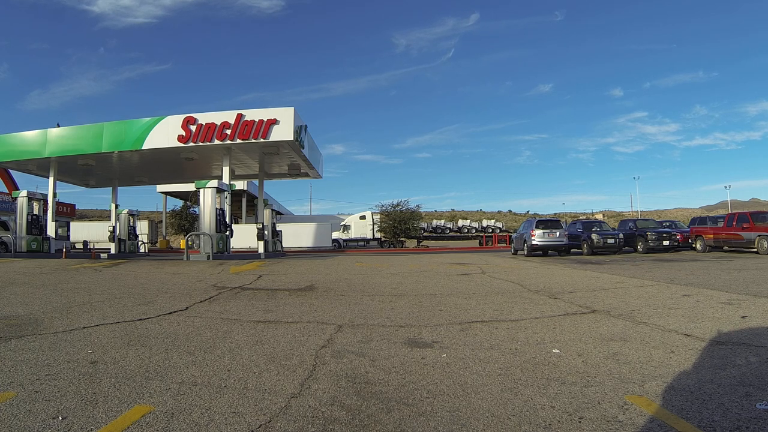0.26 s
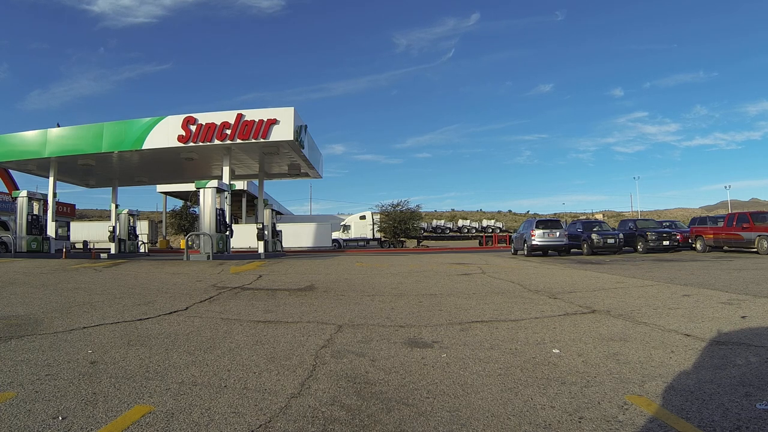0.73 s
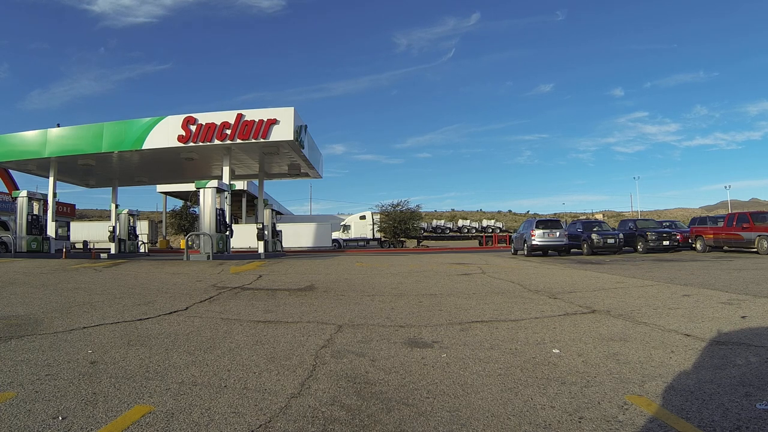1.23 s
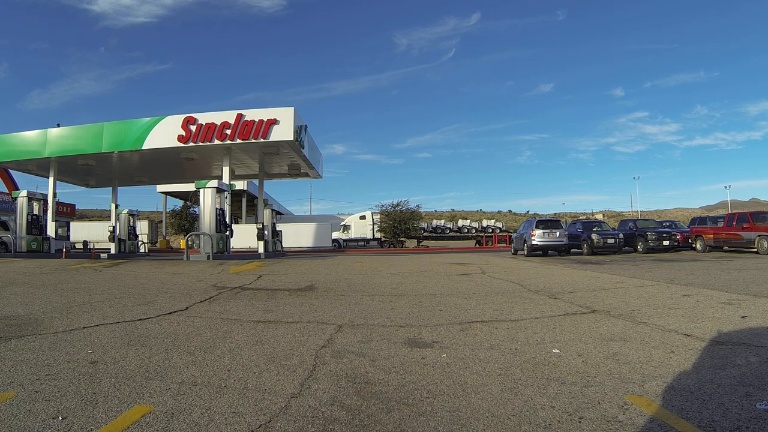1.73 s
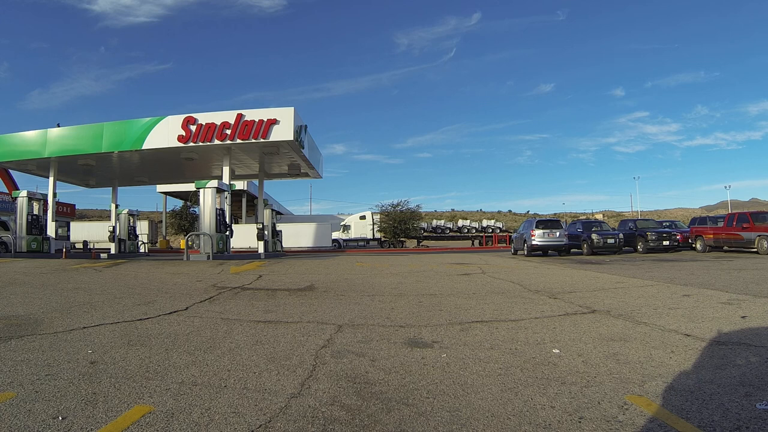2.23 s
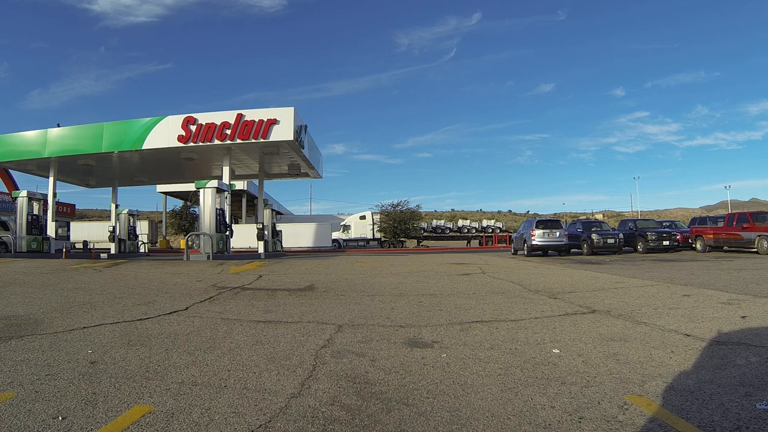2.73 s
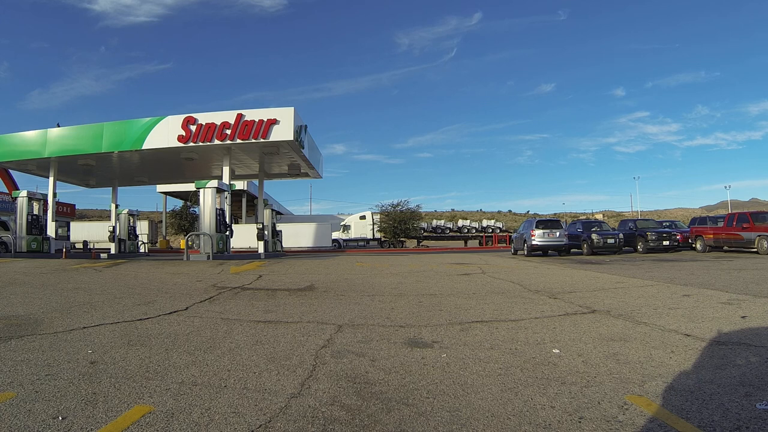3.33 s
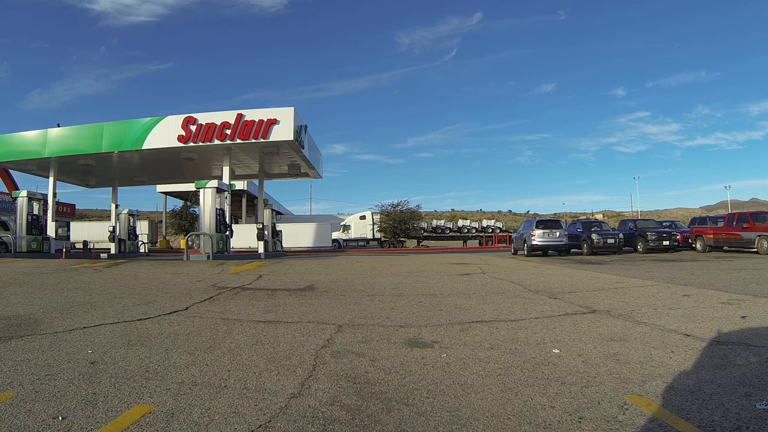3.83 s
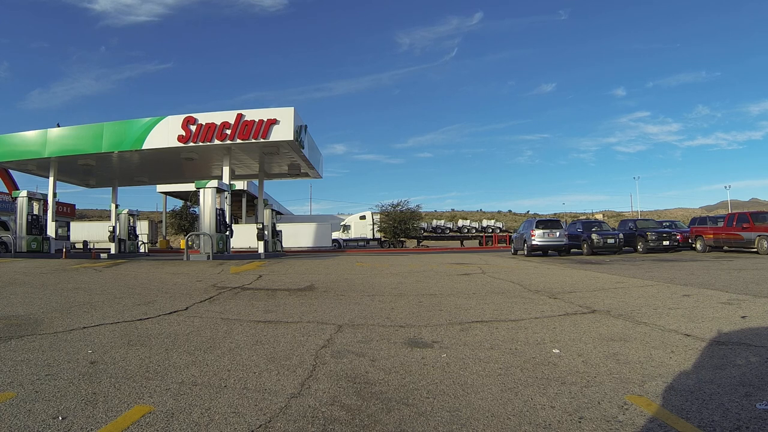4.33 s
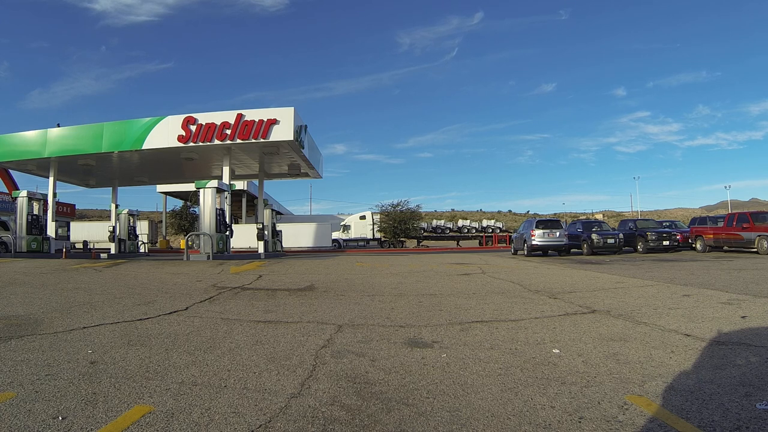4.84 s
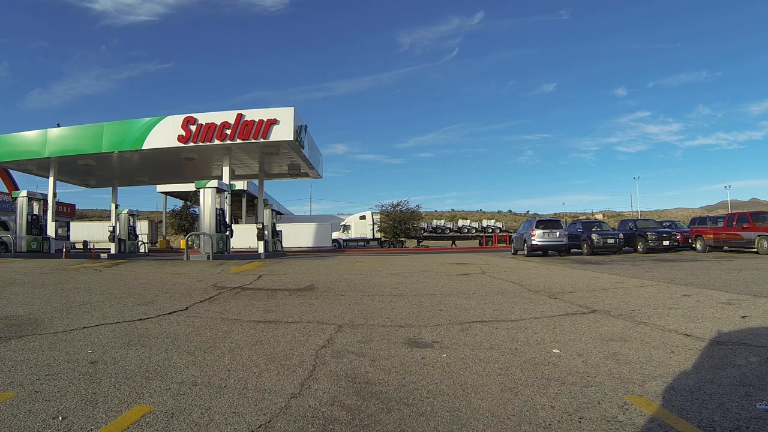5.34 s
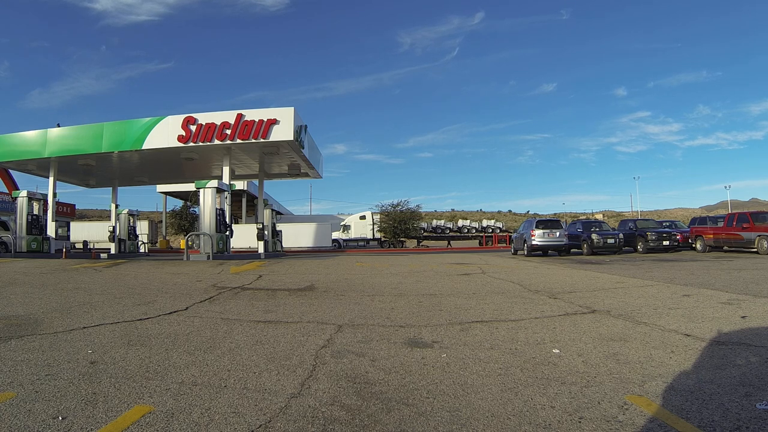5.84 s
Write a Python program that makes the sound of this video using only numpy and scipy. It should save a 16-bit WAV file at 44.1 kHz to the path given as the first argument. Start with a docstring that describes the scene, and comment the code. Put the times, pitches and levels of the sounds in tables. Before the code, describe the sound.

Low throbbing truck idle outdoors, a clattering diesel swelling closer, a quick squeaky air-valve spurt, and later a thump with long fading hiss.

```python
"""Parked diesels idle across a truck stop, short harmonic series beating together, as a nearer semi creeps by.
The semi knocks (noise bursts through its block), whines and drones (multiples of its crank rate), and hisses.
After one second its brake valves clack, squeak and spurt shaped noise; later a brake dumps its air
with a thump and a long fading hiss under the canopy.
Behind lies the yard's rumble; a faint electronic whine pulses on top."""
import sys
import numpy as np
from scipy import signal
from scipy.fft import rfft, irfft, next_fast_len
from scipy.io import wavfile
from scipy.ndimage import uniform_filter1d

SR = 44100
rng = np.random.default_rng(int(sys.argv[2]) if len(sys.argv) > 2 else 0)


def to_wav(sig):
    """Store sig (one row per channel, or 1-D mono) as 16-bit WAV at the path in sys.argv[1].

    Samples outside -1..1 are clipped; the rate is SR.
    """
    pcm = np.clip(np.atleast_2d(sig), -1, 1) * 32767
    pcm = np.round(pcm).astype(np.int16)
    wavfile.write(sys.argv[1], SR, pcm.T)  # frames by channels


N = 267880
TIME = np.arange(N) / SR


def gain_of(db):
    """Decibels to an amplitude factor."""
    return 10 ** (np.asarray(db) / 20)


def evened(x):
    """Scales to rms 1."""
    return x / np.sqrt(np.mean(x ** 2) + 1e-20)


def curve(rows, t=TIME):
    """Points joined by straight lines in time."""
    return np.interp(t, *np.transpose(rows))


def read(points, hz):
    """A spectrum in dB, joined by straight lines over log frequency."""
    f, db = np.transpose(points)
    return np.interp(np.log(hz + 1), np.log(f + 1), db)


def coloured(x, points, bumps=()):
    """Gives x a broad spectrum with peaks (or dips, where the lift is negative) on top, at rms 1."""
    size = next_fast_len(N)
    hz = np.fft.rfftfreq(size, 1 / SR)
    db = read(points, hz)
    for f, width, lift in bumps:
        db = db + lift / (1 + (2 * (hz - f) / width) ** 2)
    return evened(irfft(rfft(x, size) * gain_of(db), size)[:N])


def air(points, bumps=()):
    """Noise of a given colour, as of turbulent air, rms 1."""
    return coloured(rng.standard_normal(N), points, bumps)


def swept(x, field):
    """A moving filter: field(Hz, s) gives its gain in dB."""
    hz, t, z = signal.stft(x, SR, nperseg=512, noverlap=384)
    return signal.istft(z * gain_of(field(hz[:, None], t)), SR, nperseg=512, noverlap=384)[1][:N]


def drift(rate):
    """Random wander of rms 1: twelve sine waves, the fastest at rate Hz."""
    t = np.linspace(0, TIME[-1], num=2000)
    waves = sum(np.sin(2 * np.pi * (f * t + rng.random())) for f in rate * np.geomspace(.1, 1, num=12))
    return np.interp(TIME, t, evened(waves))


def burst(s, hold, t60, rise=0.0038):
    """A gain that opens at s, holds (timed from s), and dies away by 60 dB in t60 seconds."""
    t = TIME - s
    return np.clip(t / rise, 0, 1) * 1e-3 ** (np.maximum(t - hold, 0) / t60)


def arch(centre, width, t=TIME):
    """A smooth rise to 1 and back."""
    return np.exp(-((t - centre) / width) ** 2)


def cycle_db(crest, period, depth_db):
    """A slow, regular swell in dB."""
    return depth_db * np.cos(2 * np.pi * (TIME - crest) / period)


def swells(rows):
    """A gain that rises, holds and falls once for each row; rows add in power."""
    power = 0
    for start, end, db, rise, fall in rows:
        level_db = db - rise * np.maximum(start - TIME, 0) - fall * np.maximum(TIME - end, 0)
        power = power + gain_of(level_db) ** 2
    return np.sqrt(power)


def squeal(hz, width_hz):
    """Noise in a narrow band that follows a pitch curve; rms 1."""
    noise = rng.standard_normal(N) + 1j * rng.standard_normal(N)
    narrow = signal.lfilter(*signal.butter(2, width_hz, fs=SR), noise)
    return evened((narrow * np.exp(2j * np.pi * np.cumsum(hz) / SR)).real)


# Far traffic and machinery across the yard. Each row: frequency in Hz, relative density in dB per Hz.
YARD = [(10, -22), (18, -4.5), (35, -1.5), (65, 1), (105, -3), (160, -5.5), (215, -9.5), (285, -9.5),
        (400, -16.5), (700, -17.5), (1400, -22.5), (2500, -34.5), (4200, -41), (11000, -58.5), (15000, -62)]
# Gentle rises and dips in the yard's noise. Each row: centre in Hz, width in Hz, lift in dB (negative cuts).
YARD_BUMPS = [(590, 50, 3), (1664, 110, 3), (2880, 800, 0), (3440, 200, 1.5), (10700, 700, -8)]


def yard_rumble():
    """Far traffic and machinery: noise weighted to the bass, wavering gently."""
    return gain_of(-37.5 + .5 * drift(1.99)) * air(YARD, YARD_BUMPS)


# Engines parked across the lot. Each row: firing rate in Hz, then levels of harmonics 1 to 4 in dB
# before the throb and the overtones' slow changes.
IDLERS = [(26.6, -37, -44, -62, -58), (45.0, -34, -43, -52, -57), (44.44, -58, -44, -52, -60),
          (54.95, -47, -44, -60, -62)]
# Swells of all harmonics, then of the overtones alone: time of a crest in seconds, period in seconds,
# depth in dB.
THROB = (1.6, 1.76, 0.9)
OVERTONE_THROB = (1.84, 1.017, 2.8)


def parked_engines(wander_turns=0.014, waver_db=0.45):
    """Each exhaust is a short harmonic series; near rates beat, and overtones ease off over time."""
    out = np.zeros(N)
    overtones_db = 1.5 - 0.54 * TIME + cycle_db(*OVERTONE_THROB)
    for hz, *levels in IDLERS:
        turns = hz * TIME + rng.random() + wander_turns * drift(1.207)
        for k, db in enumerate(levels, 1):
            level_db = db + waver_db * k * drift(2.7) + overtones_db * (k > 1)
            out += gain_of(level_db) * np.sin(2 * np.pi * (k * turns + rng.random()))
    throb_db = -1.44 + 0.37 * TIME + cycle_db(*THROB)  # the whole level grows slowly
    return np.sqrt(2) * out * gain_of(throb_db)


# The semi swings past and away from the microphone.
PASS_S, PASS_WIDTH_S = 3.6, 1  # midpoint and half length in seconds


def moved(t):
    """How far the semi has swung away, 0 to 1."""
    return (1 + np.tanh((t - PASS_S) / PASS_WIDTH_S)) / 2


# Six cylinder knocks in one crank turn: the strength of each in dB.
STROKES_DB = [0.5, -1.3, -1.5, -2, 1.2, -2.5]


def knocks(turns, knock_t60=0.187, ring_t60=0.57, ring_db=-9, loose=0.43, uneven=0.13):
    """Six knocks a crank turn, each repeating its own ring at one of three lags, plus loose rattle."""
    slots = len(STROKES_DB)
    stroke = np.floor(turns * slots).astype(int)
    at = np.flatnonzero(np.diff(stroke)) + 1
    t = np.arange(SR // 4) / SR
    steady, power, blows = np.zeros(N), np.zeros(N), np.zeros(N)
    blows_db = np.take(STROKES_DB, stroke[at], mode="wrap") + 0.24 * rng.standard_normal(len(at))
    blows[at] = gain_of(blows_db)
    interval = TIME[-1] / len(at)
    for slot in range(slots):
        age = t - interval * uneven * (slot % 3)  # each group of cylinders sounds a little later
        decay = gain_of(-60 * age / knock_t60) + gain_of(ring_db - 60 * age / ring_t60)
        fade = np.clip(age / 0.0053, 0, 1) * decay
        own = blows * (stroke % slots == slot)
        steady += signal.oaconvolve(own, fade * rng.standard_normal(len(t)))[:N]
        power += signal.oaconvolve(own ** 2, fade ** 2)[:N]
    rattle = np.sqrt(abs(power)) * rng.standard_normal(N)
    return np.sqrt(1 - loose) * evened(steady) + np.sqrt(loose) * evened(rattle)


# Block and gear lines. Each row: multiple of the crank rate, level in dB while the truck faces the
# microphone, level in dB once it has turned away; both before the lift, the facing filter and the swells.
WHINE = [(16, -17, -17), (18, -13, -14), (21, -25, -24), (24, -12.5, -21), (36, -16, -17.5), (42, -26, -18),
         (43, -17.5, -23), (44, -17.5, -23), (46, -30, -22), (48, -12.5, -18), (50, -14, -16),
         (51, -30, -16), (53, -17, -23), (54, -15, -21), (57, -18.5, -28), (58, -21, -13.5),
         (59, -12.5, -26), (70, -24, -17), (72, -14, -18.5), (75, -16.5, -19), (76, -19, -19),
         (78, -18, -20), (81, -14, -21), (82, -18, -26), (87, -15, -19), (92, -19, -19), (99, -14, -24),
         (112, -23, -18), (134, -19, -25)]


def gear_lines(turns, waver_db=1.5, wander_turns=.025):
    """Steady multiples of the crank rate, whose balance shifts as the truck turns."""
    away = moved(TIME)
    lines = np.zeros(N)
    for k, near_db, away_db in WHINE:
        level_db = near_db + (away_db - near_db) * away + waver_db * drift(2.5)
        phase = k * turns + rng.random() + wander_turns * drift(7)
        lines += gain_of(level_db) * np.sin(2 * np.pi * phase)
    return lines * gain_of(-.5 + 1.5 * arch(2.95, .75))  # stands out most as it pulls


# The semi's crankshaft picks up a little from idle, then hunts. Each row: time in seconds, turns per second.
CRANK = [(0, 11.76), (.5, 11.67), (1, 11.83), (1.5, 11.95), (2, 11.97), (2.3, 12.07), (2.7, 12.02),
         (3.7, 12.12), (3.9, 12.06), (4.3, 12.17), (4.6, 12.14), (4.9, 12.21), (5.15, 12.06), (5.5, 12.21),
         (6, 12.05)]
# Its engine block. Each row: frequency in Hz, relative density in dB per Hz.
BLOCK = [(130, -17), (210, -3.5), (330, -5), (400, -4), (426, -13), (464, -2.5), (586, -1.5), (718, -2),
         (773, -4), (879, -2.5), (1160, -5.5), (1260, -6), (1400, -5.5), (2340, -17.5), (3500, -25),
         (4200, -61), (5460, -62), (9240, -120)]
# Peaks and dips in the block's sound. Each row: centre in Hz, width in Hz, lift in dB (negative cuts).
BLOCK_BUMPS = [(380, 110, -3.5), (645, 150, -1), (764, 33, -3.5), (980, 310, 2), (1290, 71, -0.5),
               (1396, 59, 2), (1516, 35, -2.5), (1820, 180, 2), (3514, 80, 7)]
# Its exhaust tones. Each row: multiple of the crank rate, level in dB before the swell.
EXHAUST = [(3, -49), (5.5, -53), (6, -48), (8.5, -41), (9, -46), (10, -52), (12, -50.5), (13, -56.5),
           (15, -52), (17, -54), (20, -61)]
# Swells of the knock with its gears, then of the exhaust. Each row: full from and until in seconds,
# level in dB, rise and fall in dB per second.
KNOCK = [(0, .03, -46.5, 15, 16), (2.48, 5.25, -36.5, 11, 8.5)]
DRONE = [(.3, 4.9, 0, 12, 5.5)]


def semi(body_db=-1):
    """Knocks sound the block, gears whine, exhaust drones; turning dulls treble and booms the low middle."""
    turns = np.cumsum(curve(CRANK) * (1 + 0.00064 * drift(5))) / SR
    body = gain_of(body_db) * coloured(knocks(turns), BLOCK, BLOCK_BUMPS)

    def facing(hz, t):
        """Shelves on the treble and the low middle, and one panel that rings more as it turns away."""
        treble = np.clip((hz - 1430) / 300, 0, 1)
        low_middle = np.clip((560 - hz) / 250, 0, 1)
        treble_db = 2 - 5.5 * moved(t) + 1.5 * arch(PASS_S, PASS_WIDTH_S, t)  # flares, then dulls
        boom_db = -3.5 + 5 * arch(4.43, 0.97, t)  # crest while the pipe faces this way
        ring_db = 4 * moved(t) * arch(1385, 50, hz)
        return ring_db + treble_db * treble + boom_db * low_middle

    drone = np.zeros(N)
    for k, db in EXHAUST:
        drone += gain_of(db + 1.66 * drift(1.99)) * np.sin(2 * np.pi * (k * turns + rng.random()))
    engine = swept(body + np.sqrt(2) * gear_lines(turns), facing)
    return swells(KNOCK) * engine + swells(DRONE) * np.sqrt(2) * drone


# The semi's soft hiss. Each row: full from and until in seconds, level in dB before the pavement bounce,
# rise and fall in dB per second.
HISS = [(0, .05, -64, 17, 10), (1.7, 2.4, -56.5, 17, 3.5), (4.1, 5.5, -57.5, 13, 6)]
# Its colour. Each row: frequency in Hz, relative density in dB per Hz.
HISS_COLOUR = [(2500, -6.5), (3400, 3.5), (3900, 0.5), (4700, 1.5), (5800, 1.5), (7200, -0.5), (7700, -8),
               (8400, -10.5), (9900, -9), (10700, -20.5), (14000, -30)]


def steady_hiss(dip_db=-7, crest_db=3, crest_ratio=1.46):
    """The pavement bounce cuts a dip and lifts a crest that slide down as the truck moves."""
    def bounce(hz, t):
        """A dip sliding from 6330 to 3900 Hz, with a broad crest above it."""
        place = hz / (6330 - 2430 * moved(t))
        return dip_db * arch(1, 0.047, place) + crest_db * arch(crest_ratio, 0.19, place)
    return swells(HISS) * swept(air(HISS_COLOUR), bounce)


# A faint electronic whine. Each row: centre in Hz, width in Hz, level in dB before switching,
# start in the cycle 0-1, share of the cycle 0-1.
WHISTLES = [(5660, 49, -72, 0, .47), (11300, 40, -82.5, 0, 0.44), (12290, 60, -86.5, .38, .62)]
# Its ticks. Each row: frequency in Hz, relative density in dB per Hz.
TICK_COLOUR = [(2500, -10), (4200, 8), (7000, -1), (9500, 1), (13000, 0), (15000, -6)]


def electronic_whine(cycle_hz=29.97, tick_share=0.22):
    """Thin high tones switch on and off in every short cycle, with two faint noise ticks in each."""
    cycles = cycle_hz * TIME
    tones = np.zeros(N)
    for hz, width, db, start, share in WHISTLES:
        on = uniform_filter1d(1. * ((cycles - start) % 1 < share), size=80)
        tones += gain_of(db) * squeal(np.full(N, hz), width) * on
    ticking = (2 * cycles + tick_share / 2) % 1 < tick_share
    return tones + gain_of(-71) * air(TICK_COLOUR) * ticking


# The brake valve's moving gap. Each row: time in seconds, spacing of its resonances in Hz.
GAP = [(1.18, 1050), (1.225, 1220), (1.26, 1315), (1.29, 1360), (1.31, 1275), (1.335, 1180), (1.355, 1115),
       (1.39, 1090)]


def gap_spacing(t=TIME):
    """Hz between the resonances of the valve's gap, which climbs and falls back."""
    return curve(GAP, t)


def flow(s, rise, hold, db, growth_db, t60):
    """The gain of air through a valve that opens ever wider, then shuts."""
    return gain_of(db + growth_db * np.clip(TIME - s, 0, hold)) * burst(s, hold, t60, rise)


# Valve spurts. Each row: start in seconds, level in dB, hold in seconds, decay t60 in seconds,
# treble tilt in dB per octave, share of the pipe's ring 0-1.
SPURTS = [(1.074, -38.5, 0.0084, 0.092, -1, .4), (1.103, -40, .01, 0.22, -1.2, .6),
          (1.435, -42.5, 0.035, 0.24, -0.5, 1), (1.56, -42, 0.008, 0.1, 0.5, .9),
          (1.582, -45.5, .008, .09, 0, .9), (1.782, -50, .005, .06, 3, .5)]
# Colour of the spurts and clacks. Each row: frequency in Hz, relative density in dB per Hz.
VALVE = [(500, -2), (1000, 0), (1450, 1), (1900, 0), (2800, -4), (3500, 1), (4900, -11), (5800, -8),
         (7000, -10), (8100, -11), (9400, -23), (10700, -18), (12000, -40)]
# The valve's ringing pipe. Each row: centre in Hz, width in Hz, full lift in dB, of which each sound
# takes a share.
PIPE = [(920, 80, 16), (1450, 130, 2), (2310, 90, 9), (2760, 110, 7), (3300, 110, 2), (3710, 81, 5),
        (4380, 350, 4), (5580, 110, 13), (5940, 120, 11), (6450, 90, 8), (8250, 110, 5), (10400, 120, 7)]
# Air forced through the moving valve, then the thin leak: opening in seconds, rise in seconds,
# hold in seconds, level in dB before rush_db and flutter, growth in dB per second, closing t60 in seconds.
SQUEEZE = (1.14, 0.1, 0.192, -51, 25, 0.84)
LEAK = (1.53, 0.1, 0.26, -53.3, 14, 0.12)
# Colours of that squeezed air and leak. Each row: frequency in Hz, relative density in dB per Hz.
SQUEEZE_COLOUR = [(700, -17), (1180, 4), (1500, 4.5), (2400, 1), (3300, 2), (4050, 0), (4500, -7),
                  (5400, -5), (6500, -4), (8100, -8), (9400, -19), (10700, -14), (12000, -32)]
LEAK_COLOUR = [(2000, 0), (3300, 3.5), (4100, -22), (5000, -11), (6200, 0.5), (7200, -7), (8200, -7),
               (9300, -22), (10800, -19), (12200, -30)]
# The leak's narrow opening rings. Each row: centre in Hz, width in Hz, lift in dB.
LEAK_RINGS = [(2834, 120, 5), (3330, 220, 5), (5130, 90, 7), (5700, 200, 6), (6400, 100, 6), (7300, 120, 5),
              (7850, 90, 6), (8550, 100, 10), (10850, 150, 7)]


def valve_air(crest_db=6.5, crest_hz=4900, rush_db=-1.0):
    """Short spurts, a squeezed rush whose resonances arch, and a thin leak (rush_db trims the rush alone)."""
    def pipe(share):
        return [(f, width, share * lift) for f, width, lift in PIPE]

    out = np.zeros(N)
    for s, db, hold, t60, tilt_db, ring in SPURTS:
        tilt = [(500, 0), (16000, 5 * tilt_db)]  # five octaves
        jet = coloured(air(VALVE, pipe(ring)), tilt)
        out += gain_of(db) * burst(s, hold, t60) * jet

    def gap(hz, t):
        """Evenly spaced resonances of the valve's gap, sharpest in the middle treble."""
        crests = np.cos(np.pi * hz / gap_spacing(t)) ** 10
        emphasis = .7 + .3 * arch(crest_hz, 1200, hz)
        return crest_db * crests * emphasis / (1 + (hz / 7500) ** 4)

    rush = gain_of(rush_db) * evened(swept(air(SQUEEZE_COLOUR, pipe(0.52)), gap))
    out += rush * flow(*SQUEEZE)
    out += air(LEAK_COLOUR, LEAK_RINGS) * flow(*LEAK) * gain_of(1.4 * drift(160))
    return out * gain_of(1.1 * drift(110))  # the air flutters


# The valve squeaks as it opens and seats. Each row: start in seconds, level in dB, starting pitch in Hz,
# length in seconds.
SQUEAKS = [(1.075, -43.5, 2880, 0.015), (1.312, -48.5, 1290, .032), (1.354, -48, 3390, .012),
           (1.366, -51, 4520, .016), (1.44, -38.5, 1500, 0.02), (1.561, -43, 1600, 0.01),
           (1.582, -44, 1530, .012)]
# Gap resonances that sing in turn. Each row: multiple of the gap spacing, loudest at in seconds,
# half length in seconds, level in dB.
SONGS = [(3, 1.218, .025, -53.5), (4, 1.203, .014, -55), (4, 1.28, .032, -54), (3, 1.3, .024, -48),
         (2, 1.293, .014, -52), (5, 1.335, .025, -56), (4, 1.335, .02, -56), (3, 1.345, .02, -55),
         (6, 1.33, .03, -63), (1, 1.32, .025, -51)]


def valve_squeaks(sag=3.1, squeak_width_hz=45, song_width_hz=160):
    """Each squeak falls in pitch; resonances of the squeezed air sing in rough snatches."""
    out = np.zeros(N)
    for s, db, hz, length in SQUEAKS:
        pitch = hz * np.exp(-sag * np.clip(TIME - s, 0, .06))
        out += gain_of(db) * burst(s, length, 0.026) * squeal(pitch, squeak_width_hz)
    for k, s, width, db in SONGS:
        out += gain_of(db) * arch(s, width) * squeal(k * gap_spacing(), song_width_hz)
    return out


# The valve's piston clacks against its seat. Each row: start in seconds, level in dB.
CLACKS = [(1.438, -43), (1.444, -38.5), (1.458, -41), (1.476, -41.5), (1.563, -40), (1.582, -39.5),
          (1.589, -43)]
# Its metal housing rings. Each row: frequency in Hz, level in dB re the clack, decay t60 in seconds.
HOUSING = [(1340, -1, .04), (1500, 1, .05), (2400, -7, .04), (3290, -10, .04), (3700, -9, .04),
           (4330, -9, .14), (5660, -10, .2), (5950, -14, .07), (6480, -13, .06)]


def valve_clacks(crack_db=2, crack_t60=0.015, detune=0.0097):
    """Each clack is a short crack that leaves the housing ringing, a little differently each time."""
    t = np.arange(SR // 4) / SR
    rings, cracks = np.zeros(N), np.zeros(N)
    for s, db in CLACKS:
        ring = np.zeros(len(t))
        for hz, level, t60 in HOUSING:
            pitch = hz * (1 + detune * rng.standard_normal())
            ring += gain_of(level - 60 * t / t60) * np.sin(2 * np.pi * (pitch * t + rng.random()))
        rings[round(s * SR):][:len(t)] += gain_of(db) * ring * np.minimum(t / .001, 1)
        cracks += gain_of(db + crack_db) * burst(s, 0, crack_t60, rise=0.0011)
    return rings + air(VALVE) * cracks


# The pop as the brake valve opens. Each row: frequency in Hz, relative density in dB per Hz.
POP = [(120, -34), (215, -11), (262, -4), (310, -4.5), (420, -16), (700, -13), (1500, -34), (2700, -40),
       (4000, -42), (8000, -58)]


def brake_thump():
    """The opening valve pops and the brake chamber rings once, at 262 Hz."""
    pop = gain_of(-34) * air(POP) * burst(4.663, .025, .12, rise=.012)
    chamber = np.sin(2 * np.pi * 262 * TIME) * burst(4.661, .024, .2, rise=.013)
    return pop + gain_of(-30) * chamber


# Colour of the dumped air. Each row: frequency in Hz, relative density in dB per Hz.
DUMP_COLOUR = [(1500, -16.5), (2700, -6), (3600, -7.5), (4050, -12), (4700, -5), (5900, -1), (7000, -3.5),
               (7900, -8.5), (8500, -11), (10100, -9.5), (10600, -18), (11200, -23), (13000, -28),
               (14800, -45)]
# The ringing nozzle. Each row: centre in Hz, width in Hz, lift in dB.
NOZZLE = [(3550, 200, 2), (4700, 28, 4), (4950, 120, 4), (5500, 40, 2), (5610, 70, 6), (6010, 45, 12),
          (6340, 110, 3), (7900, 170, 7), (8500, 270, 2.5)]
# The band that sings as the chamber drains. Each row: frequency in Hz, relative density in dB per Hz.
SING = [(4300, -40), (4950, -9), (5350, -11), (5610, 0), (5800, -5), (6010, -5), (6400, -2.5), (6900, -16),
        (7600, -50)]
DUMP_S, DUMP_RISE_S = 4.661, 0.016  # start and rise in seconds


def brake_dump(dulling_db=7.0, flutter_db=0.9, sing_db=-2):
    """A blast, then a jet that narrows to a singing band as the pressure falls, until the valve shuts."""
    since = np.maximum(TIME - DUMP_S, 0)

    def narrowing(hz, t):
        """Dulls each octave away from 5800 Hz, ever more for one second."""
        return -dulling_db * np.clip(t - DUMP_S, 0, 1) * abs(np.log2((hz + 1) / 5800))

    jet = swept(air(DUMP_COLOUR, NOZZLE), narrowing)
    jet = jet + gain_of(sing_db) * np.minimum(since, 1) * air(SING)
    blast = gain_of(-33) * burst(DUMP_S, 0.021, 0.237, DUMP_RISE_S)
    drain = gain_of(-40.5 - 60 * since / 2.846) * burst(DUMP_S, 0.71, 0.94, DUMP_RISE_S)
    return jet * np.hypot(blast, drain) * gain_of(flutter_db * drift(90))


def canopy(x, wet_db, t60):
    """Scattered reflections from the roof, pumps and trailers: a decaying noise tail."""
    t = np.arange(SR) / SR
    tail = rng.standard_normal(SR) * (t > .012) * gain_of(-60 * t / t60)
    return x + gain_of(wet_db) * signal.fftconvolve(x, tail / np.linalg.norm(tail))[:N]


def scattered(x, echo_db, spread=.022, count=14):
    """A few early echoes off trailers and pumps ripple the spectrum."""
    taps = np.zeros(SR // 10)
    delays = (SR * rng.uniform(.002, spread, count)).astype(int)
    taps[delays] = rng.choice([-1, 1], count) * gain_of(echo_db) / np.sqrt(count)
    taps[0] = 1  # the direct sound
    return signal.oaconvolve(x, taps / np.linalg.norm(taps))[:N]


def scene():
    """Engines and air, over the rumble of the yard, in one channel."""
    engines = yard_rumble() + parked_engines() + semi()
    valves = valve_air() + valve_squeaks() + valve_clacks()
    brakes = canopy(valves + brake_dump(), wet_db=-12.0, t60=0.71)
    hisses = scattered(steady_hiss() + brakes, echo_db=-12.0)
    return (engines + electronic_whine() + brake_thump() + hisses)[None]


def record(dry):
    """The microphone chain's band limit: a steep low-pass at 15.2 kHz."""
    lowpass = signal.firwin(511, 15200, window=("kaiser", 9), fs=SR)
    return signal.oaconvolve(dry, lowpass[None], "same")


dry = scene()
out = record(dry)
to_wav(out)
```